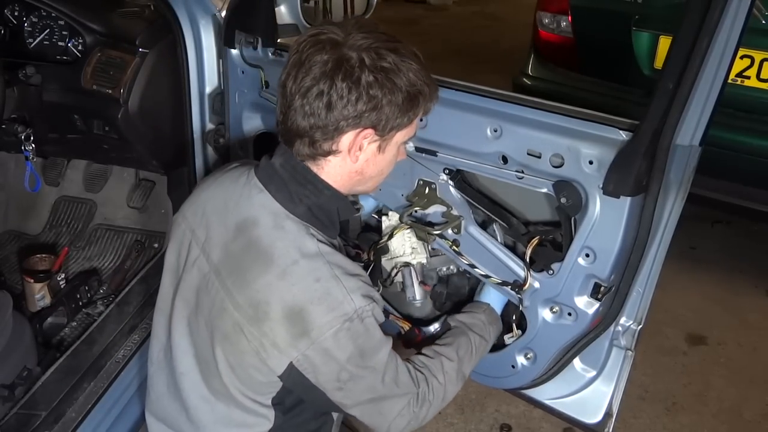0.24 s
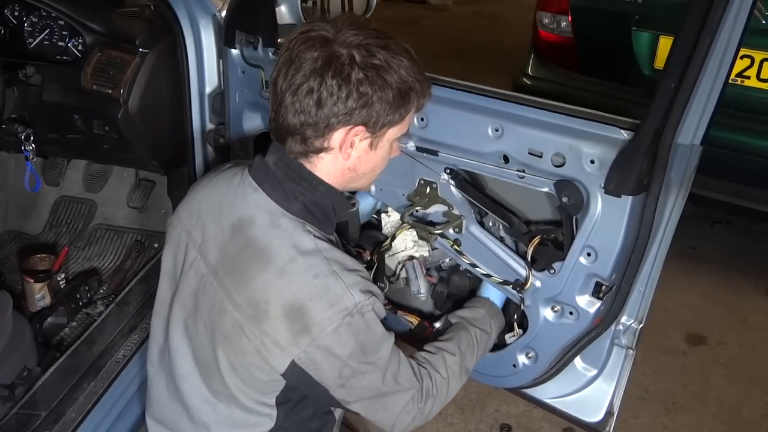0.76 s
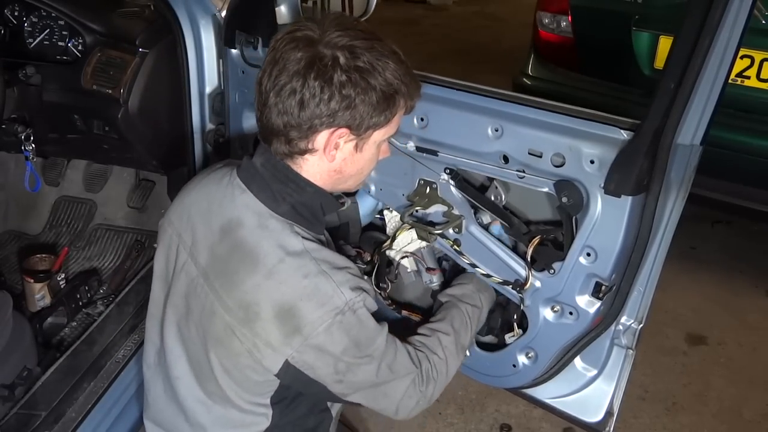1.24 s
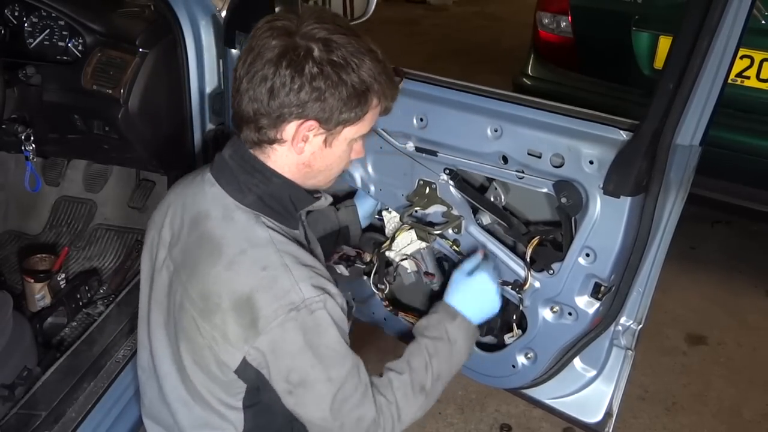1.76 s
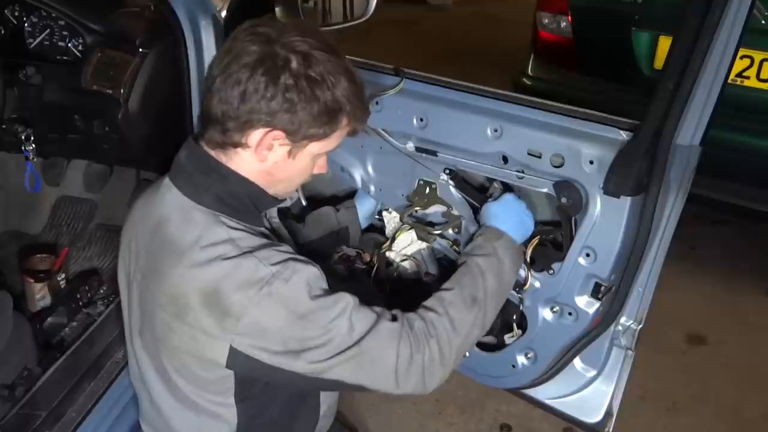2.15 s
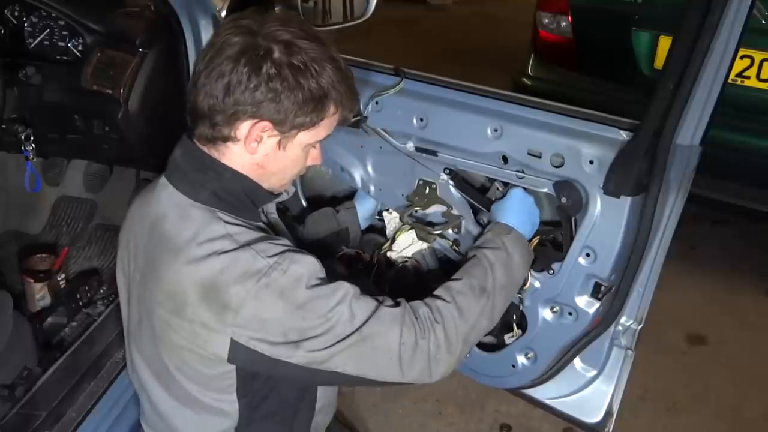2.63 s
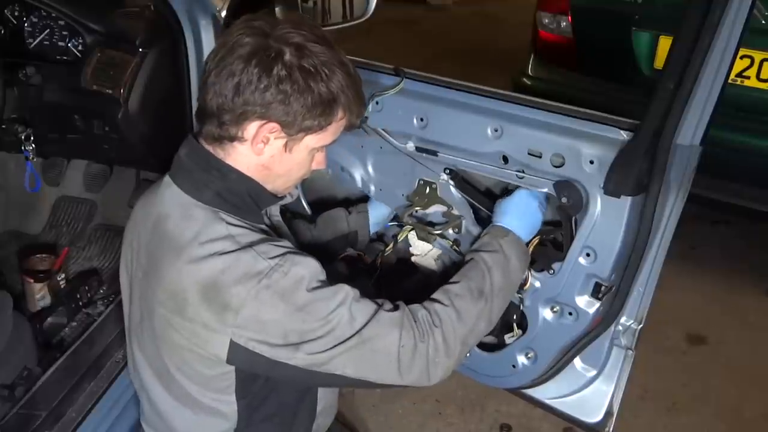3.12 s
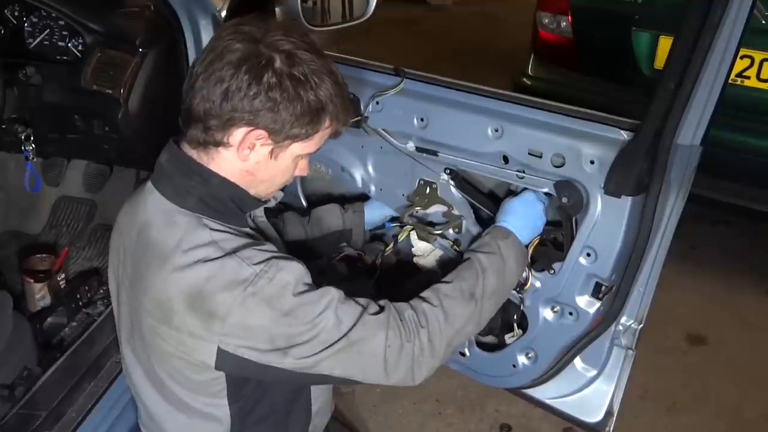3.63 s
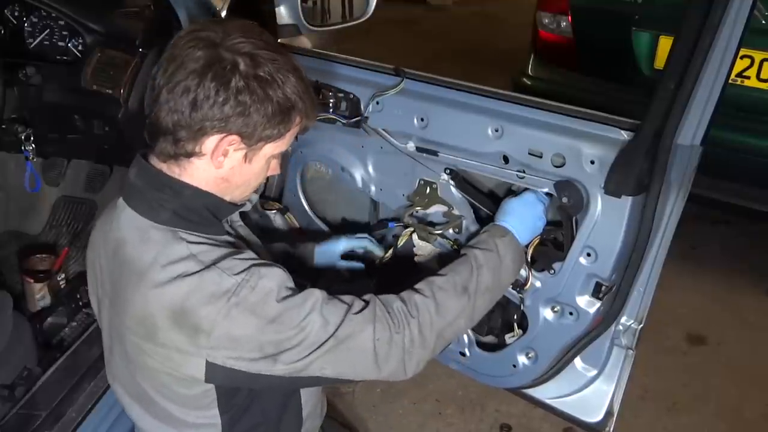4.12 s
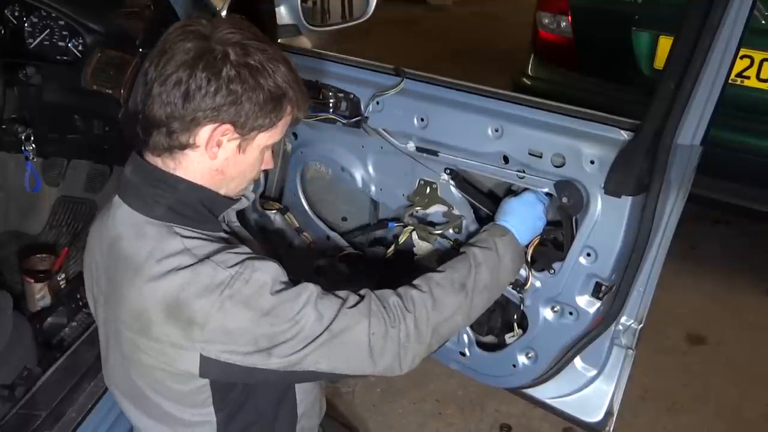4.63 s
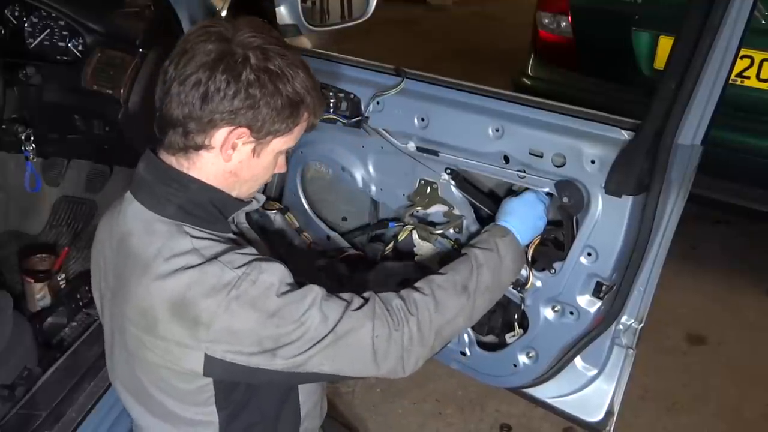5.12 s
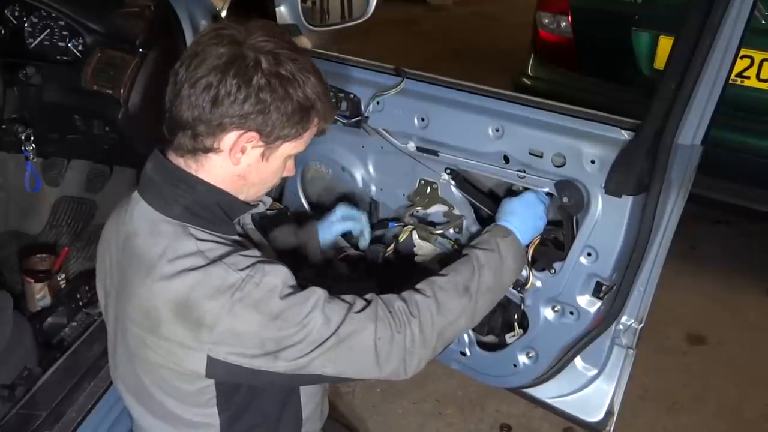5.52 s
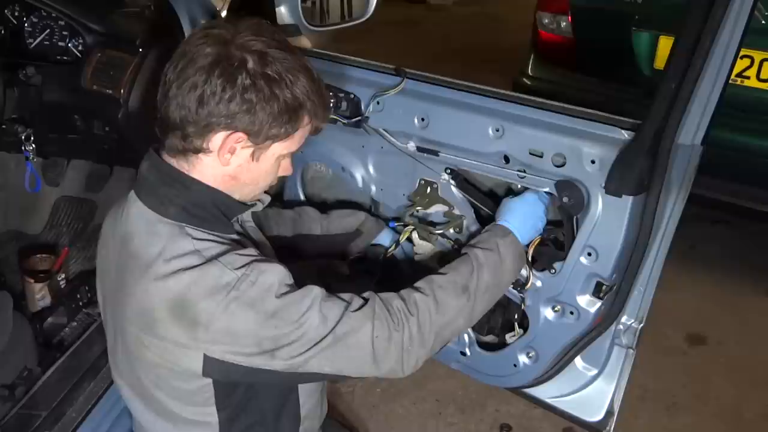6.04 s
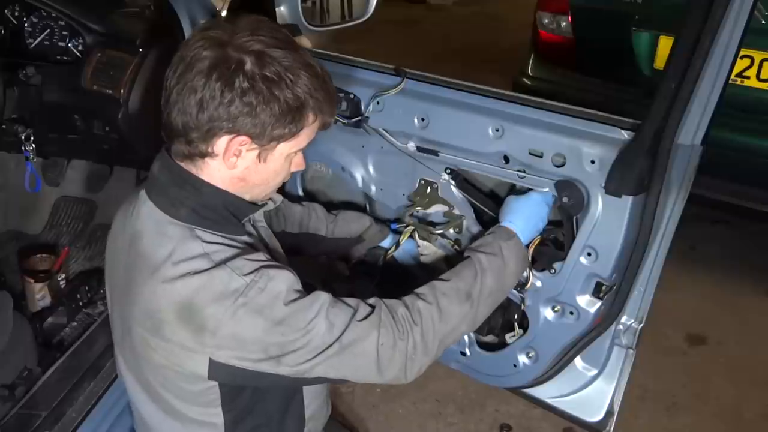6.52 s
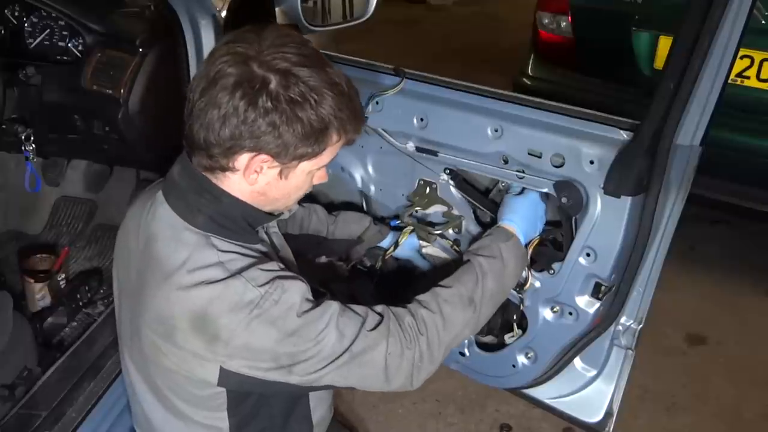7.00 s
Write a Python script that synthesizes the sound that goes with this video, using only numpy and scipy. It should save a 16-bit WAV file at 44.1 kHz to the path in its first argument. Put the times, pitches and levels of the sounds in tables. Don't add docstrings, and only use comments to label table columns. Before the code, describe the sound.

In a workshop with a low steady hum, metal parts knock and drag against a hollow steel car door, dull at first. After a quiet gap with faint glove rubbing, a hard clattering burst booms through the panel. Then a loose rail is struck repeatedly, ringing with clear, short metallic clanks, loudest late on, before a few last duller knocks. Close microphone, sounds near the centre.

```python
import sys
import numpy as np
from scipy import signal
from scipy.io import wavfile
from scipy.ndimage import uniform_filter1d

SR = 44100
rng = np.random.default_rng(int(sys.argv[2]) if len(sys.argv) > 2 else 0)


def store_wav(level_fs):
    pcm = np.round(np.clip(np.atleast_2d(level_fs), -1, 1) * 32767)
    wavfile.write(sys.argv[1], SR, pcm.T.astype(np.int16))


def voltage_ratio(level):
    return 10 ** (np.asarray(level, float) / 20)


N = 320154
RING = SR * 2 // 3

# frequency in Hz, level in dB per Hz.
SHOP_SPECTRUM = [(20, -112), (40, -85), (62, -79.5), (90, -91), (160, -90), (500, -93.5), (1000, -100),
                 (2000, -105), (5000, -108), (8000, -107), (10000, -111), (13000, -115), (16000, -124)]
# frequency in Hz, side against mid in dB.
SHOP_WIDTH = [(25, -27), (60, -21), (110, -11), (200, -4), (380, 0.5), (700, 2), (1290, 2.5), (2380, -1.5),
              (4400, -7), (8120, -12.5), (11000, -10), (15000, -30)]
# frequency in Hz, side against mid in dB.
BODY_WIDTH = [(60, -25), (110, -29), (200, -24), (380, -37), (700, -16), (1290, -12), (2380, -11.5),
              (4400, -15.5), (8120, -16), (10000, -9.5), (12000, -28), (15000, -30)]
SIDE_HZ = [45, 12100]

# start in seconds, length in seconds,
# share of the stroke before its peak, boom in dB, hiss against boom in dB.
DOOR_DRAG = [(0.0, 0.028, 0.041, -34.5, 4.5), (.1, 0.35, 0.49, -52.5, -9), (.35, 0.34, 0.54, -43.5, -8),
             (.86, 0.55, 0.26, -44, -11), (.608, 0.031, 0.28, -50.5, 7), (.718, 0.036, 0.27, -54, -1),
             (1.0, 0.23, 0.21, -59.5, 8), (1.17, 0.15, 0.66, -45, 2.5), (1.25, 0.088, 0.4, -43, 5.5),
             (1.17, 0.049, 0.48, -41, -10), (1.58, 0.083, 0.45, -61, -16), (2.72, 0.25, 0.69, -42.5, -5),
             (2.94, 0.16, 0.12, -34, 4), (3.08, 0.23, 0.34, -42.5, 5), (3.28, 0.067, .1, -40, -11),
             (6.22, 0.28, 0.06, -51.5, -24), (6.5, 0.27, 0.73, -47, -9), (6.82, 0.095, 0.44, -49, -11)]
# start in seconds, body level in dB, hardness (0 boom, 1
# knock, 2 clank), tick level in dB.
DOOR_KNOCKS = [(0.014, -33, 0.085, -60), (0.161, -31.5, 1.25, -38), (0.352, -29, 0.7, -40),
               (0.363, -34, 0.11, -53), (0.393, -32, 0.98, -35), (0.449, -40, 1.8, -69),
               (0.497, -36, 1.6, -48), (0.532, -33.5, 0.58, -44.5), (0.614, -41, 2.3, -52),
               (0.727, -42.5, 1.5, -61), (0.844, -41, 1.2, -51), (0.85, -30.5, 0.27, -47),
               (0.896, -30, 1.79, -55), (1.004, -47, 2.9, -47), (1.044, -44.5, 0.69, -48),
               (1.111, -41, 0.081, -44), (1.2, -41, 1.4, -63), (1.259, -39, 3.1, -49),
               (1.276, -52, 2.7, -62), (1.309, -41.5, 0.48, -52), (1.583, -50.5, 0.51, -49.5),
               (1.63, -54, 0.22, -58),
               (2.487, -53.5, 0.1, -63), (2.531, -50, 0.1, -71), (2.744, -48.5, 0.9, -77),
                (2.824, -57, 1.8, -62), (2.899, -38, 0.24, -42.5), (2.939, -29, 1.66, -49),
                (2.981, -26.5, 1.4, -50), (3.07, -23, 2.24, -27.5), (3.15, -32, 1.56, -50),
                (3.21, -37.5, 0.67, -35.5), (3.272, -23.5, 1.85, -62), (3.3, -29.5, 1.3, -40),
                (3.795, -34, 1.16, -52), (6.273, -42.5, 0.27, -39), (6.368, -45.5, 0.1, -46.5),
                (6.468, -36.5, 1.37, -53), (6.593, -49.5, 1.3, -55), (6.649, -47.5, 1, -71),
                (6.804, -32.5, 1.1, -75), (6.707, -46.5, 0.74, -59), (6.919, -36.5, 0.84, -58),
                (6.947, -34.5, 1.5, -48.5)]
# delay in seconds, share of the force.
DOOR_BOUNCES = [
    (.01, 0.093),
    (.022, 0.17),
]
# frequency in Hz, level in dB, t60 in seconds.
DOOR_MODES = [(223, 13.5, 0.16), (285, -16, 0.73), (290.5, 7, 0.45), (344, 8.5, 0.24), (450, -18, 0.18),
              (550, -0.5, 0.36), (674, -30, 0.66), (763, 10.5, 0.11), (918, -49, 0.37), (1230, -27, 0.43),
              (1490, -32, 0.2), (1880, -18, 0.27), (2360, -50, 0.26)]
# frequency in Hz, level in dB, t60 in seconds.
DOOR_DENSE = [(70, 10, 0.32), (172, 7.5, 0.4), (500, 10, 0.13), (1120, -3, 0.41), (2300, -5.5, 0.51),
              (5860, -10.5, 0.55), (8670, -7.5, 0.67), (11250, -30, 0.35), (15000, -59, 0.32)]
DOOR_EDGES = [140, 500, 1500, 4000, 16000]
DRAG_EDGES = [140, 700, 3000, 16000]
MOVES_S = [
    .345,
    2.3,
    3.262,
    5,
]
# centre in Hz, width in Hz, level in dB.
CORNER_COLOUR = [(2050, 800, 4.5), (2600, 530, -9), (3300, 770, 5.5), (4150, 450, 1), (4800, 380, 7),
                 (5200, 500, 4)]
# centre in Hz, width in Hz, level in dB.
SKIN_COLOUR = [(158, 35, -8.5), (760, 180, -1), (1150, 470, -4.5), (2150, 430, 2), (3540, 230, 4)]
# centre in Hz, width in Hz, level in dB.
FRAME_COLOUR = [(159, 79, 3.5), (760, 200, -4), (1220, 360, 2), (1610, 230, -5), (2900, 720, 2)]
# centre in Hz, width in Hz, level in dB.
BRACKET_COLOUR = [(500, 310, 0), (1250, 560, 3.5), (1680, 300, -2), (2600, 790, -3)]
# centre in Hz, width in Hz, level in dB.
SILL_COLOUR = [(320, 60, 3), (507, 130, -1), (950, 210, 0.5), (1500, 400, 0), (1780, 170, -5),
               (2300, 440, -1.5)]

# start in seconds, peak in dB,
# boom in Hz, clunk in Hz, clunk against the peak in dB.
PATCHES = [(0.014, -25, 238, 823, -25.5), (0.167, -26.5, 351, 554, -14.5), (0.237, -36.5, 233, 564, -33),
           (0.362, -30, 284, 480, -14), (0.498, -39, 363, 680, -22), (0.614, -42, 293, 543, -5.5),
           (0.852, -40, 360, 526, -8), (1.039, -35, 366, 550, -11), (1.212, -38, 350, 479, -10),
           (1.31, -38, 302, 526, -8), (2.53, -48, 274, 604, -33), (2.98, -31, 307, 1253, -10),
           (3.077, -29.5, 353, 944, -7), (3.272, -26.5, 291, 740, -37), (3.298, -29.5, 285.4, 1276, -10),
           (3.792, -41.5, 285, 1218, -6), (6.262, -44, 285, 710, -19), (6.472, -36.5, 300, 674, -6),
           (6.804, -33.5, 297.5, 1245, -3.5), (6.889, -34, 298, 813, -30), (6.916, -45.5, 225, 853, 1),
           (6.95, -39, 245, 652, -6)]
# start in seconds, peak in dB.
MOTOR_KNOCKS = [(0.015, -40), (0.1676, -29), (0.4957, -52), (0.899, -44), (2.945, -32), (3.0727, -24.5),
                (3.2721, -28), (3.3053, -25), (3.7985, -26.5), (6.4682, -30), (6.6087, -33.5),
                (6.8065, -19), (6.9157, -26.5), (6.949, -57)]
# frequency in Hz, level in dB, t60 in seconds.
MOTOR_MODES = [(694, -0.5, 0.3), (933, -12, 0.49), (1098, -15, 0.48), (1196, -4.5, .6), (1345, -9, .6),
               (1420, 3.5, 0.17), (1475, -6, 0.32), (1776, -9.5, 0.33), (2010, -13, 0.48),
               (2090, -19, 0.32), (2200, -35, 0.19)]
# start in seconds, peak in dB, centre in Hz, t60 in seconds.
CLINKS = [(0.016, -32.5, 1400, 0.18), (0.021, -39.5, 4810, 0.13), (0.162, -34, 1574, 0.18),
          (0.396, -37, 8220, 0.11), (0.497, -30, 2154, 0.097), (0.525, -38.5, 6670, 0.17),
          (0.615, -47, 2780, 0.13), (0.897, -27, 2240, 0.052), (3.04, -29, 2900, 0.086),
          (3.072, -25, 2940, 0.15), (3.207, -36.5, 2740, 0.13), (3.301, -38, 1383, 0.33),
          (3.33, -37, 1250, 0.44), (3.797, -38, 1298, 0.38), (5.024, -24, 2900, 0.15),
          (5.041, -22.5, 3245, 0.084), (6.47, -40, 2100, 0.16), (6.55, -56, 2150, 0.38),
          (6.621, -58, 2300, 0.23), (6.808, -39, 2100, 0.14), (6.821, -35, 1345, .12),
          (6.85, -51, 2300, .2), (6.946, -39, 2430, 0.15)]
# start in seconds, peak in dB, frequency in Hz, t60 in seconds.
TWANGS = [(.017, -50, 4800, 0.62), (0.018, -49, 3060, 0.39), (0.164, -51, 4750, 0.53),
          (.165, -53, 3240, 0.3), (0.168, -43, 1620, .25), (.167, -38, 760, 0.25), (.395, -37, 2850, .15),
          (.395, -36, 3630, 0.076), (.45, -31.5, 790, 0.13), (3.272, -22, 918, 0.13),
          (3.272, -25, 2150, 0.13), (3.305, -59, 607, .15), (4.208, -39.5, 1333, 0.58),
          (4.392, -33.5, 1340, 0.39), (4.392, -32, 2044, 0.31), (4.549, -31.5, 1338, 0.24),
          (4.6957, -24, 2095, 0.45), (4.834, -34.5, 1880, 0.47), (4.905, -33, 1874, 0.22),
          (5.022, -30.5, 1384, 0.29), (5.023, -26.5, 2696, .2), (5.024, -33, 2200, .3),
          (5.042, -39, 1930, .31), (4.697, -29, 1333, 0.26), (4.7, -46, 1028, 0.26),
          (4.83, -33, 2600, 0.38), (5.03, -35, 1150, 0.26), (5.155, -46, 3400, 0.36), (.532, -32, 780, 0.2),
          (.358, -27.5, 790, 0.16), (1.237, -43, 3640, .2), (3.795, -41, 320, 0.26),
          (5.0414, -42, 1340, 0.41), (5.155, -22.5, 2090, 0.4), (5.154, -23.5, 1321, 0.35),
          (5.185, -33, 500, 0.13), (5.572, -25, 2100, 0.32), (5.569, -26, 1323, 0.4),
          (5.59, -33, 2220, 0.88), (5.881, -38, 1316, 0.18), (5.925, -36.5, 1420, 0.27),
          (6.108, -48, 1320, 0.2), (.615, -42, 552, 0.18), (.73, -48, 348, .15), (5.89, -36, 505, .25),
          (6.474, -35, 1460, 0.18), (6.619, -41, 329.6, .5), (6.64, -45.5, 773, 0.42),
          (6.68, -48, 344, 0.45), (6.808, -27, 933, 0.19), (6.809, -32, 1680, 0.14),
          (6.949, -28.5, 950, 0.12)]
# start in seconds, level in dB.
SWAYS = [
    (0.021, -41.5),
    (1.252, -44.5),
    (2.892, -38),
    (2.956, -26),
    (3.27, -50),
]
# start in seconds, level in dB, start in Hz, end in Hz, length in seconds.
THUMPS = [
    (.362, -22.5, 240, 324, 0.024),
    (.402, -25.5, 240, 310, 0.0225),
    (6.81, -27, 280, 320, 0.022),
    (3.288, -23, 254, 270, .012),
    (6.886, -36, 288, 332, 0.02),
    (.531, -36, 341, 345, 0.048),
    (.898, -26.5, 290, 294, 0.0086),
]

# start in seconds, length in seconds, share before the peak, level in dB.
GLOVES = [(1.573, 0.046, 0.16, -51.5), (1.62, 0.14, .3, -66), (2.177, 0.085, 0.36, -49),
          (2.234, 0.099, 0.32, -50.5), (2.299, 0.087, 0.42, -53.5), (2.364, 0.079, .4, -62),
          (2.49, 0.086, .45, -61), (3.397, 0.45, 0.14, -60.5), (3.862, 0.06, 0.46, -57.5),
          (4.047, 0.063, 0.74, -56.5), (4.123, 0.12, 0.56, -54.5), (4.214, 0.16, 0.056, -49.5),
          (6.186, 0.27, 0.36, -51.5)]
# centre in Hz, width in Hz, level in dB.
GLOVE_COLOUR = [(3740, 350, 3.5), (4900, 1600, -2.5), (6100, 720, -0.5), (8740, 1500, 6.5)]

# start in seconds, body level in dB, hardness (0 boom, 1 knock, 2 clank,
# more is harder still), tick level in dB.
RAIL_KNOCKS = [(4.204, -28.5, 1.03, -46), (4.389, -27, 1, -43), (4.546, -29, 0.89, -46.5),
               (4.6945, -18, 1.75, -17.5), (4.829, -32, 2.32, -44), (5.578, -13, 1.49, -21.5),
               (5.024, -20, 2.8, -46), (4.912, -38, 2.2, -55), (5.042, -23, 2.48, -33),
               (4.7015, -24.5, 2.25, -20), (5.153, -13.5, 1.404, -30), (5.569, -10.5, 1.4, -22.5),
               (5.88, -24, 1.34, -37.5), (6.106, -41, 0.65, -52)]
# delay in seconds, share of the force.
RAIL_BOUNCES = [
    (.011, 0.11),
    (.025, 0.15),
]
# start in seconds, length in seconds,
# share before the peak, boom in dB, hiss against boom in dB.
RAIL_DRAG = [
    (4.72, 0.076, .2, -28.5, -15),
    (4.85, 0.17, 0.47, -37.5, 1.5),
    (5.022, 0.035, 0.33, -49, 20),
    (5.89, 0.27, 0.29, -66, 21),
]
# frequency in Hz, level in dB, t60 in seconds.
RAIL_MODES = [(290, -3, .26), (350, -2, .24), (449, -4, .27), (511, -2, .28), (690, -10, .25),
              (789, -12, .29), (933, -11, .3), (1287, -6, .34), (1432, -7, .36), (1610, -10, .33),
              (1740, -11, .3), (1880, -10, .35), (1980, -8, .36), (2062, -7, .36), (2197, -4, .36),
              (2570, -13, .35), (3350, -12, .35)]
# frequency in Hz, level in dB, t60 in seconds.
RAIL_DENSE = [(136, -1, 0.4), (217, -7.5, 0.43), (293, 5, 0.3), (590, -3.5, 0.26), (1080, -9, 0.39),
              (1530, -8, 0.5), (1680, -6.5, 0.46), (2100, -8.5, 0.55), (2680, -15.5, 0.63),
              (4800, -15, 0.71), (8770, -7.5, 0.69), (10670, -27, 0.51), (15000, -46, .4)]
RAIL_EDGES = [140, 600, 2500, 5000, 16000]
RATTLE_EDGES = [140, 1150, 3000, 16000]
# centre in Hz, width in Hz, level in dB.
RAIL_COLOUR = [(387, 80, -3), (820, 230, 0.5), (1100, 180, -2), (1306, 260, 3.5), (1800, 540, -3),
               (2120, 350, 0), (2520, 160, -4.5), (3000, 400, 0), (3480, 180, 4.5), (6400, 1000, -2.5),
               (8500, 1200, 2.5)]
# start in seconds, level in dB, Hz it starts flat.
NOTES = [
    (4.204, -35, 100),
    (4.39, -31.5, 100),
    (4.546, -28, 154),
    (4.695, -34, 50),
    (5.153, -21.5, 100),
    (5.569, -15, 96),
    (5.882, -30, 241),
    (6.108, -40.5, 242),
]


def at_hz(points, hz, column=1):
    points = np.array(points)
    return np.interp(np.log(hz), np.log(points[:, 0]), points[:, column])


def band(x, low_hz, high_hz):
    return signal.sosfilt(signal.butter(2, [low_hz, high_hz], "band", fs=SR, output="sos"), x + 1e-18)


def shaded(x, colour):
    for hz, width_hz, level_db in colour:
        w = 2 * np.pi * hz / SR
        a = voltage_ratio(level_db / 2)
        q = np.sin(w) * width_hz / hz / 2
        above = [1 + q * a, -2 * np.cos(w), 1 - q * a]
        below = [1 + q / a, -2 * np.cos(w), 1 - q / a]
        x = signal.lfilter(above, below, x + 1e-18)
    return x


def third_octaves(size, gain, width):
    white = rng.standard_normal((2, 2, size + 4000))
    edges = 20 * 2 ** np.arange(0, 9.8, 1 / 3)
    out = 0
    for k, (low, high) in enumerate(zip(edges, edges[1:])):
        hz = np.sqrt(low * high)
        noise = band(white[k % 2], low, high)[:, -size:]
        out = out + noise * gain(hz) * voltage_ratio([[0], [at_hz(width, hz)]])
    return out


def stroke(start_s, length_s, share, level_db, fade_db):
    peak_s = np.clip(share, .01, .99) * length_s
    away = np.interp(np.arange(N) / SR - start_s, [0, peak_s, length_s], [1, 0, 1])
    return (away < 1) * voltage_ratio(level_db - fade_db * away ** 1.22)


def coloured(clicks, edges, gains):
    out = 0
    for k, (low, high, gain) in enumerate(zip(edges, edges[1:], gains)):
        out = out + (-1) ** k * band(clicks * gain, low, high) * np.sqrt(SR / 2 / (high - low))
    return out


def knocks(rows, edges, chatter_s, trim_db, again, bounces, duller_db, brighter_db):
    rows = np.array(rows)
    later = (0.0999 + rng.random((len(rows), 8))) * chatter_s
    sizes = rng.normal(0, again, later.shape)
    later[:, :3], sizes[:, :3] = np.transpose([(0, 1), *bounces])
    uneven = rng.uniform(-1, 1, (len(rows), 4))
    later[:, 1:3] *= 1 + .2 * uneven[:, :2]
    sizes[:, 1:3] *= np.sign(uneven[:, 2:])

    at = np.clip(((rows[:, :1] - .002 + later) * SR).astype(int), 0, N - 1)
    clicks, which = np.zeros(N), np.zeros(N, int)
    clicks[at], which[at] = sizes, np.arange(len(rows))[:, None]

    above = np.arange(3)[:, None] - rows[:, 2]
    loss_db = np.where(above > 0, brighter_db * above, -duller_db * above)
    levels_db = [*(rows[:, 1] - loss_db), rows[:, 3]]
    gains = [voltage_ratio(level_db[which] + db) for level_db, db in zip(levels_db, trim_db)]
    gains[0] = gains[0] * 0.81
    gains[3] = gains[3] * np.where(clicks == 1, .85, 2.2)
    return coloured(clicks, edges, gains)


def drag(rows, edges, per_s, uneven_db, trim_db, fade_db):
    clumps = np.repeat(rng.exponential(1, N // 256 + 1), 256)[:N]
    slips = rng.random(N) < per_s * clumps / SR
    sizes = voltage_ratio(uneven_db * np.minimum(rng.exponential(1, N), 4))
    clicks = slips * sizes * rng.choice([-1, 1], N)
    tilt = np.array([[0], [.5], [1]])
    gains = sum(stroke(*row[:4], fade_db) * voltage_ratio(row[4] * tilt) for row in rows)
    return coloured(clicks / clicks.std(), edges, gains * voltage_ratio(np.array(trim_db)[:, None]))


def body(modes, dense, modes_db, first_db, split):
    t = np.arange(RING) / SR

    def swell(hz):
        return 1 - np.exp(-t / (0.0013 + 1.0 / hz))

    def dying(hz):
        slow = voltage_ratio(-60 * t / at_hz(dense, hz, column=2))
        crack = voltage_ratio(first_db - 60 * t / 0.056) / (1 + (900 / hz) ** 2)
        return voltage_ratio(at_hz(dense, hz)) * swell(hz) * (slow + crack)

    answer = third_octaves(RING, dying, BODY_WIDTH)
    splits = rng.uniform(-0.81, 1, (len(modes), 3)) * [0, split, split]
    for (hz, level_db, t60), shares in zip(modes, splits):
        cluster = [1, .55, .45] @ np.sin(2 * np.pi * hz * (1 + shares[:, None]) * t)
        answer[0] += voltage_ratio(modes_db + level_db - 60 * t / min(t60, .36)) * swell(hz) * cluster
    return answer


def struck(force, *part, count=3):
    spot = np.arange(N) // 3000 % count
    out = 0
    for k in range(count):
        share = np.sqrt(np.clip(uniform_filter1d(1. * (spot == k), size=800), 0, 1))
        out = out + signal.fftconvolve((force * share)[None], body(*part), axes=1)[:, :N]
    return out


def ringing(rows, rise_s, neighbour=0.51, wander=1.04):
    t, out = np.arange(RING // 2) / SR, np.zeros(N + RING)
    shake = band(rng.standard_normal(N + RING), 6.4, 47.0)
    shake = wander * shake / shake.std()
    for s, level_db, hz, t60 in rows:
        start = round(s * SR)
        phase = 2 * np.pi * hz * t + shake[start:start + len(t)] * np.sqrt(hz / 1000)
        tone = np.sin(phase) + neighbour * np.sin(2 * np.pi * (hz + 26.6) * t)
        out[start:start + len(t)] += tone * voltage_ratio(level_db - 60 * t / t60) * (1 - np.exp(-t / rise_s))
    return out[:N]


def shop():
    air = third_octaves(N, lambda hz: voltage_ratio(at_hz(SHOP_SPECTRUM, hz)), SHOP_WIDTH)
    return voltage_ratio(-62) * air / air[0].std()


def door():
    blows = knocks(DOOR_KNOCKS, DOOR_EDGES, .016, [-10.5, -8.0, -7.0, -4.5], 0.17,
                   DOOR_BOUNCES, duller_db=5.0, brighter_db=17.0)
    force = blows + drag(DOOR_DRAG, DRAG_EDGES, 700, 3.6, [-40., -38., -33.], fade_db=17.0)
    part = np.searchsorted(MOVES_S, np.arange(N) / SR)
    colours = [CORNER_COLOUR, SKIN_COLOUR, FRAME_COLOUR, BRACKET_COLOUR, SILL_COLOUR]
    force = sum(shaded(force * (part == k), colour) for k, colour in enumerate(colours))
    return struck(force, DOOR_MODES, DOOR_DENSE, -24.5, 9.6, 0.048)


def patches():
    booms = [(s, peak_db + 0.5, boom_hz, 0.18) for s, peak_db, boom_hz, _, _ in PATCHES]
    clunks = [(s, peak_db + clunk_db + 9.0, clunk_hz, 0.16) for s, peak_db, _, clunk_hz, clunk_db in PATCHES]
    return ringing(booms, 0.0027) + ringing(clunks, 0.0015)


def motor():
    spread_db = rng.normal(0, 0.49, (len(MOTOR_KNOCKS), len(MOTOR_MODES)))
    rows = []
    for (s, peak_db), extras in zip(MOTOR_KNOCKS, spread_db):
        for (hz, mode_db, t60), extra_db in zip(MOTOR_MODES, extras):
            rows.append((s - .002, peak_db + mode_db - 16.0 + extra_db, hz, min(t60, .45)))
    return ringing(rows, 0.0024)


def clinks():
    shares = np.linspace(-1, 1, num=12) + rng.uniform(-.08, .08, (len(CLINKS), 12))
    rows = []
    for (s, peak_db, hz, t60), spread in zip(CLINKS, shares):
        for share in spread:
            rows.append((s, peak_db - 9.5 - 14.0 * share ** 2, hz * (1 + 0.24 * share), t60))
    return ringing(rows, 0.001)


def cable():
    return ringing([(s, peak_db - 5.0, hz, t60) for s, peak_db, hz, t60 in TWANGS], 0.00083)


def sway():
    return ringing([(s, level_db - 6.0, 59.0, 0.41) for s, level_db in SWAYS], 0.055, neighbour=1.9)


def thumps():
    t, out = np.arange(RING // 8) / SR, np.zeros(N + RING)
    for s, level_db, start_hz, end_hz, length_s in THUMPS:
        start = round(s * SR)
        phase = 2 * np.pi * np.cumsum(np.interp(t, [0, length_s], [start_hz, end_hz])) / SR
        choked = voltage_ratio(level_db - 1160 * np.maximum(t - length_s, 0))
        out[start:start + len(t)] += np.sin(phase) * (1 - np.exp(-t / 0.0055)) * choked
    return out[:N]


def gloves():
    white = rng.standard_normal((2, N)) * voltage_ratio([[0], [-15.]])
    hiss = band(white, 3200.0, 9000.0) + voltage_ratio(-1.5) * band(white[:, ::-1], 940.0, 4000.0)
    return sum(stroke(*row, fade_db=15.0) for row in GLOVES) * shaded(hiss, GLOVE_COLOUR)


def rail():
    blows = knocks(RAIL_KNOCKS, RAIL_EDGES, 0.012, [-4.5, -1.0, 4.0, -1.5], 0.066,
                   RAIL_BOUNCES, duller_db=13.0, brighter_db=23.5)
    force = blows + drag(RAIL_DRAG, RATTLE_EDGES, 1000, 0.84, [-42., -40., -38.], fade_db=10.5)
    return struck(shaded(force, RAIL_COLOUR), RAIL_MODES, RAIL_DENSE, -23.0, 11.0, 0.0137)


def note():
    note_hz, t60_s, lift_off_s = 790, 0.22, 0.0229
    t, out = np.arange(RING // 2) / SR, np.zeros(N + RING)
    for s, level_db, flat_hz in NOTES:
        start = round(s * SR)
        phase = 2 * np.pi * np.cumsum(note_hz - flat_hz * np.clip(1 - t / lift_off_s, 0, 1)) / SR
        beat = 1 + 0.46 * np.cos(2 * np.pi * 26.5 * (t - .025))
        decay = voltage_ratio(level_db - 60 * t / t60_s)
        out[start:start + len(t)] += np.sin(phase) * beat * decay * (1 - np.exp(-t / .012))
    return out[:N]


def scene():
    mid, side = shop() + door() + gloves() + rail()
    mid = mid + patches() + motor() + clinks() + cable() + sway() + thumps() + note()
    side = band(band(side, *SIDE_HZ), *SIDE_HZ)
    return np.array([mid + side, mid - side]) * voltage_ratio([[-.15], [.15]])


def low_pass(x):
    return signal.sosfilt(signal.butter(12, 15940, fs=SR, output="sos"), x)


def record(dry):
    dry = signal.sosfilt(signal.butter(2, 32, "high", fs=SR, output="sos"), dry)
    recovered_db = 230.0 * np.arange(N) / SR
    peak_db = 20 * np.log10(np.abs(dry).max(axis=0) + 1e-9)
    held_db = np.maximum.accumulate(peak_db + recovered_db) - recovered_db
    dry = dry * uniform_filter1d(voltage_ratio(np.minimum(-10.5 - held_db, 0)), size=45)
    mix = signal.sosfilt(signal.cheby2(14, 70, 16400, fs=SR, output="sos"), dry)
    return low_pass(mix)


dry = scene()
out = record(dry)
store_wav(out)
```